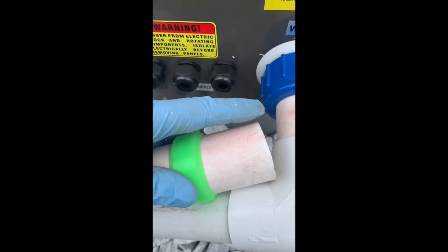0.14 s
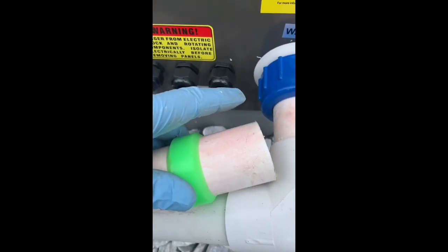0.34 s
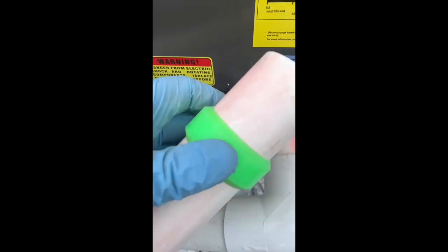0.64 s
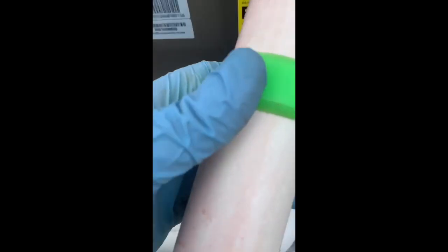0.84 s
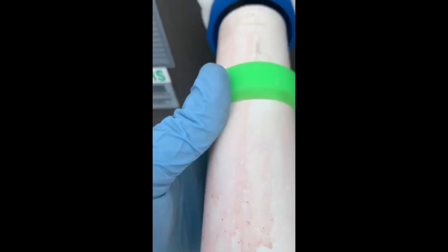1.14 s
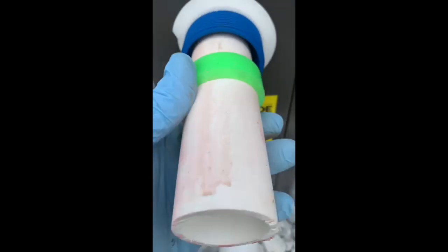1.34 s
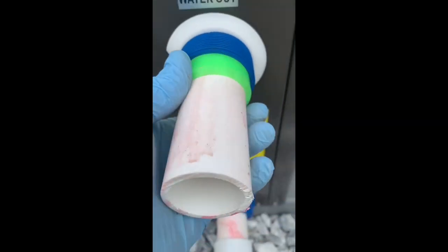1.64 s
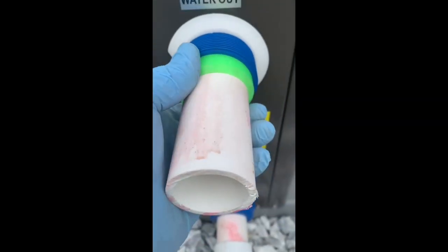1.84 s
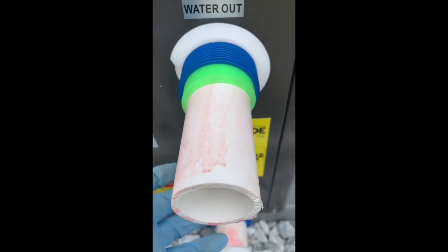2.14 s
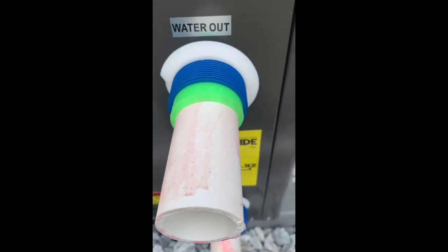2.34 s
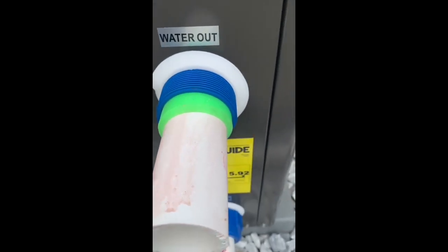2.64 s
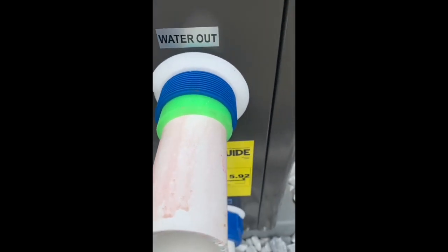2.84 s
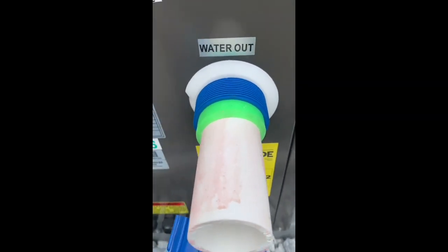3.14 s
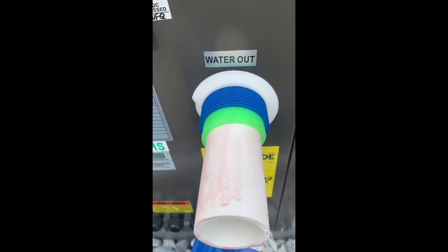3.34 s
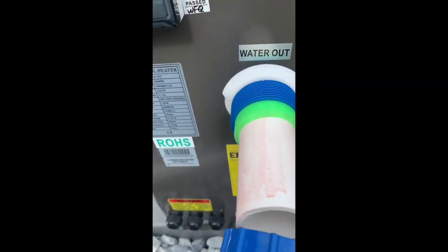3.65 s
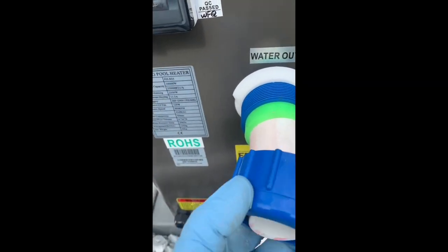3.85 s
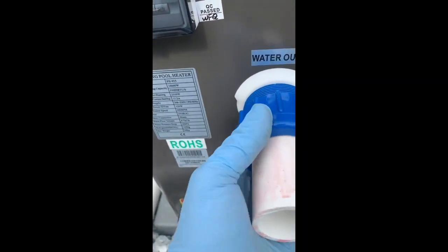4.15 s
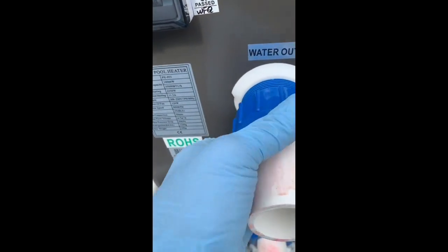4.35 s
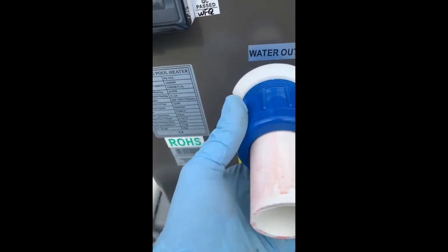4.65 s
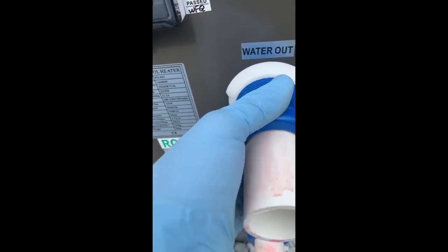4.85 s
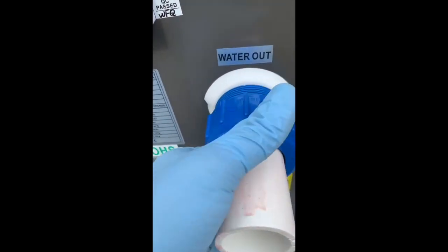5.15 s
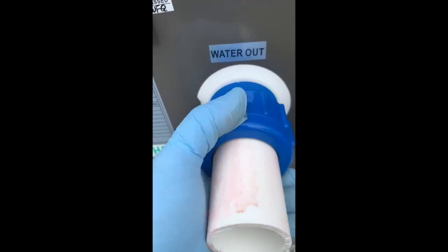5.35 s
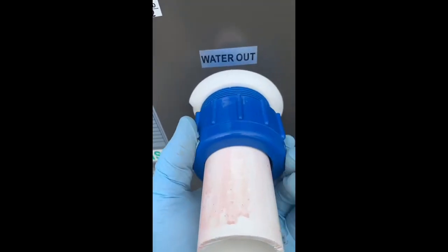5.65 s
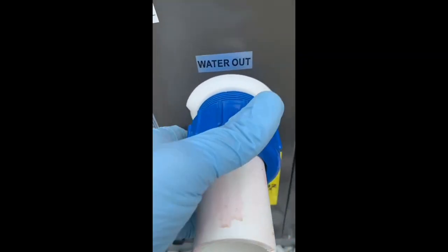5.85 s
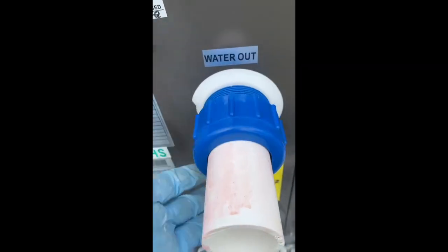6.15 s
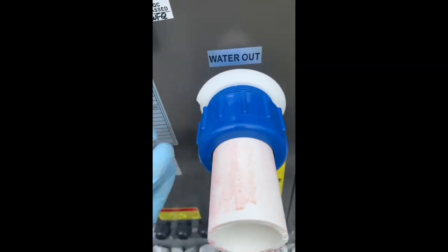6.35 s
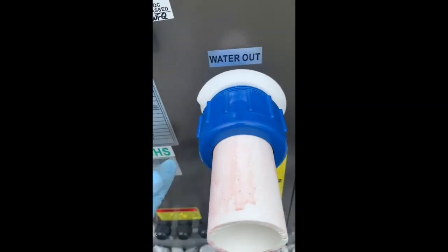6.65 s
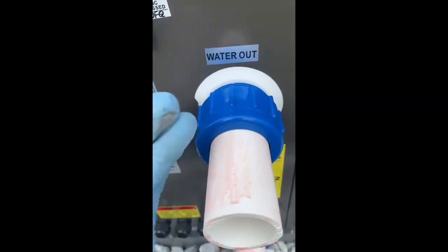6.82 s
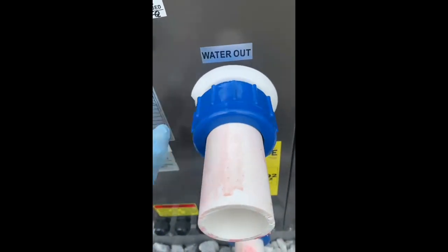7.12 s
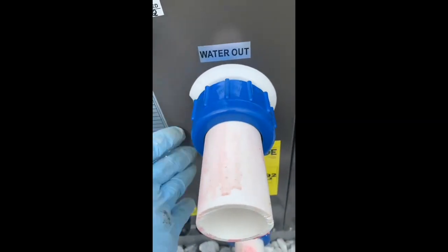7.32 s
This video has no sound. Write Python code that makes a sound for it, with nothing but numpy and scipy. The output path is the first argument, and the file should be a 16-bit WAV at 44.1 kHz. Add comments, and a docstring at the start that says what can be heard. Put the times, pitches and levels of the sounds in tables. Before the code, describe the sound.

Gloved hands knock a hard plastic pipe into a port, then screw a ribbed union nut on with increasingly loud clacks over a low outdoor hum.

```python
"""Outdoors, at the port of a heat pump: gloved hands seat a hard plastic pipe and screw a union nut onto it.
Filtered noise and two unsteady tonal hums form the background; soft bumps are decaying sines of gliding pitch.
Stick-slip impulses drive the modes of air column, wall and nut as the parts slide, and gloves brush with a hiss.
Knocks sum decaying modes and bursts of edge noise, and a noise tail makes the cabinet boom after them.
A close hand-held camera hears all this through two ports, and its gain ducks after loud knocks."""
import sys
import numpy as np
from scipy import signal
from scipy.fft import rfft, irfft, next_fast_len
from scipy.io import wavfile
from scipy.ndimage import uniform_filter1d, map_coordinates

SR = 44100
rng = np.random.default_rng(int(sys.argv[2]) if len(sys.argv) > 2 else 0)


def dump_mix(stems):
    """Bounce the given channels to the path in sys.argv[1] as a 16-bit WAV at rate SR."""
    frames = np.atleast_2d(stems).T  # one column per channel
    limited = np.clip(frames, -1, 1)  # hard clip at full scale
    pcm = np.round(limited * 32767).astype(np.int16)
    wavfile.write(sys.argv[1], SR, pcm)


N = 329868
TIME = np.arange(N) / SR

# Levels are those of the sources, ahead of the ports and the gain control.
# Hum of the near machine at the moving camera: [t/s, level/dB]
HUM_LEVEL = [(0, -48), (.8, -36.5), (2.1, -33.5), (3.1, -36.5), (3.85, -41.5), (4.2, -49.5), (7.48, -40.5)]
# Hum of a second, distant machine: [t/s, level/dB]
DRONE_LEVEL = [(0, -47.5), (1.1, -39.5), (1.7, -46), (3.1, -43.5), (4.2, -49), (4.7, -40.5), (5.05, -35),
               (5.6, -48), (7.48, -31.5)]
# First three shaft orders of the distant machine: [relative level/dB]
SHAFT_ORDERS = [-4, -2.5, -16]
# Low rumble, outdoors and from the hand on the camera: [t/s, level/dB]
RUMBLE_COURSE = [(0, -34.5), (.75, -36.5), (1.6, -35.5), (2.801, -37.5), (3.601, -35.5), (4.25, -40.5),
                 (4.649, -29), (5.35, -40.5), (5.7, -35.5), (6.1, -32.5), (6.55, -68), (7, -39),
                 (7.48, -30.5)]
# Rush of the outdoor air: [t/s, level/dB]
AIR_COURSE = [(0, -41), (1.1, -39.5), (1.8, -38.5), (2.7, -38.5), (3.6, -39.5), (4.2, -41.5), (5, -40),
              (7.48, -35.5)]
# Spectrum of the rumble: [f/Hz, relative level/dB]
RUMBLE_SPECTRUM = [(20, -47), (35, -7), (55, -0.5), (85, 1), (130, -1), (200, -11.5), (300, -39),
                   (600, -78)]
# Spectrum of the air noise: [f/Hz, relative level/dB]
AIR_SPECTRUM = [(60, 7), (170, 7), (260, 1), (400, -6), (700, -12), (1000, -17.5), (1400, -16), (1800, -24),
                (2600, -32.5), (4000, -34.5), (7500, -82), (12000, -100)]

# Soft bumps of the hand: [t/s, peak level/dB, first f/Hz, last f/Hz, hold before release/s]
HAND_BUMPS = [(0.727, -26, 101, 79, 0.028), (2.117, -19, 118, 79, 0.0087), (3.84, -22.5, 170, 131, 0.019),
              (3.905, -26, 243, 183, 0.027), (4.021, -31.5, 92, 81.5, 0.029),
              (4.605, -15.5, 149, 67, 0.028), (4.84, -18.5, 150, 60.4, 0.014),
              (5.331, -17.5, 199, 69.5, 0.014), (6.065, -11, 433, 75.6, 0.019), (6.114, -20, 110, 70, 0.01),
              (6.142, -14.5, 159, 59, 0.016), (6.907, -20, 91, 73.5, 0.054), (7.282, -13, 151, 201, 0.013),
              (7.305, -17.5, 233, 195, 0.038)]

# Plastic on plastic, first the pipe in its port, then the nut on its thread:
# [t/s, length/s, level/dB, hollow ring over it/dB, rasp centre f/Hz, rasp over it/dB]
SLIDE_STROKES = [(0.298, 0.11, -58.5, 8, 520, -8), (0.494, 0.6, -67, -26, 1050, -2),
                 (1.21, 0.15, -56, 15, 750, 8), (1.356, 0.18, -42, 0, 990, -12),
                 (1.528, .62, -56, -4, 2420, -8.5), (1.686, 0.097, -43.5, 7.5, 710, -25),
                 (1.94, 0.051, -54, -12, 3030, 2), (2.11, 2.1, -69, -6, 1350, 5.5),
                 (2.784, 0.035, -54.5, -10, 3770, -7), (3.133, 0.052, -44.5, 12, 380, -17),
                 (3.805, .11, -54.5, 5, 260, 21), (3.891, 0.022, -36, 5, 2700, -5),
                 (3.985, 0.045, -64, 14, 380, 4), (4.059, 0.18, -58, 13, 745, 11),
                 (4.147, 1.4, -57, -4, 1440, -6.5), (4.23, 0.24, -50, 1.5, 1750, -3),
                 (4.63, 0.18, -41, -19, 2650, -5.5), (4.695, .14, -45.5, -4, 1790, -5),
                 (4.863, 0.061, -42.5, 2.5, 1570, -3), (5.199, 0.069, -41.5, -13, 1590, 3),
                 (5.254, 0.075, -32.5, -4.5, 2100, -8.5), (5.361, 0.12, -46.5, 3, 1820, -0.5),
                 (5.593, 0.52, -40, -8, 1150, -19), (5.646, 0.13, -40.5, -3, 1940, 2.5),
                 (5.893, .15, -38.5, 4, 1460, 0.5), (5.998, .1, -37, -1, 1160, -23),
                 (6.153, 0.32, -38.5, 1.5, 1510, -13), (6.289, 0.041, -28.5, -6, 1120, -4.5),
                 (6.415, 0.013, -40, -4, 1100, 1), (6.497, 0.41, -30, -1, 1570, -7.5),
                 (6.772, 0.092, -29, 4.5, 1620, 0.5), (6.78, 0.023, -39, 3.5, 330, 18),
                 (6.88, 0.18, -35, 0.5, 1580, -12), (7.059, .17, -34, 1, 1540, -5.5),
                 (7.165, 0.074, -46.5, 14, 520, -2), (7.261, 0.043, -38, 9, 1540, -1.5),
                 (7.324, 0.082, -25, -4, 1610, -16)]
# Gloves brushing over the pipe: [t/s, length/s, level/dB]
BRUSH_STROKES = [(.32, 0.053, -66), (.64, 0.12, -59.5), (1.12, 0.061, -72), (1.44, 0.065, -51),
                 (1.71, 0.07, -42.5), (1.88, 0.15, -46.5), (1.97, 0.047, -37), (2.05, 0.038, -48),
                 (2.52, 0.24, -59), (2.94, 0.28, -60), (3.27, 0.039, -48.5), (3.44, 0.042, -61.5),
                 (3.98, 0.15, -35), (4.97, 0.039, -50), (5.13, 0.15, -51), (5.88, 0.13, -34.5),
                 (6.34, 0.063, -36.5), (6.58, 0.19, -45), (7.24, 0.041, -31.5), (7.37, 0.038, -31)]
# Spectrum of the scrape: [f/Hz, relative level/dB]
SCRAPE_SPECTRUM = [(300, 18), (700, 9), (1200, 13), (1900, 8.5), (2700, 7), (4000, 2), (5000, 3.5),
                   (7000, -57)]
# Spectrum of the glove hiss: [f/Hz, relative level/dB]
HISS_SPECTRUM = [(3000, -2), (4500, 0.5), (5800, 5), (7000, 7.5), (8500, 4), (10000, -10), (11700, 4.5),
                 (12400, -52)]
# Stroke onset and decay times (s), each lengthened by a share of the stroke's length
ATTACK_S, RELEASE_S, SWELL_SHARE, FADE_SHARE = 0.0099, 0.013, 0.045, 0.061
# Hiss under a slide and scrape under a brush, against the stroke (dB)
SLIDE_HISS_DB, BRUSH_SCRAPE_DB = -3, -15
# Constant scrape and hiss of the holding hand, which never rests (dB)
HOLD_SCRAPE_DB, HOLD_HISS_DB = -67.5, -76.5

# Contacts of pipe, port and nut; ring, thud, sharpness and spot levels count from the strength:
# [t/s, strength as level/dB, hollow ring/dB, thud/dB, sharpness/dB, contact length/s,
#  first favoured mode f/Hz, its level/dB, second favoured mode f/Hz, its level/dB]
CONTACTS = [(1.216, -28.5, 0, 0.5, -18, 0.0042, 738, -.5, 1470, -23),
            (1.2399, -25, -1, -2.5, -7, .0012, 1490, -7, 1795, -11),
            (1.317, -15.5, 0, -22, -12.5, 0.0013, 1030, 0, 1504, -10.5),
            (1.32, -21, 3, -4.5, -29, 0.0022, 525, 14, 417, -1),
            (1.3747, -21, 4, -2, -21, 0.00065, 751, -9, 537, -1),
            (1.4444, -31.5, 5, 4, -14, .001, 522, 8, 703, -7),
            (1.671, -32, -2.5, -1, 1, 0.0017, 720, -12, 1510, -4),
            (1.685, -41.5, -8, 14, -4, 0.0049, 516, 14, 1020, -2),
            (1.941, -60, -17, -6, 20.5, .0015, 1480, -5, 2580, 0),
            (2.086, -60, -8, 16, 15.5, .0053, 1530, 3, 7200, 17.5),
            (3.1184, -19, -1.5, -5.5, -5.5, 0.0053, 994, -7, 2800, -10.5),
            (3.127, -21, 0, 6.5, -10, 0.0061, 525, 8.5, 401, 0),
            (3.807, -42.5, 1, 13, -3, .0016, 392, 15, 700, 0),
            (3.8336, -37, 2, 10, -7, 0.0015, 726, -4, 1750, -2),
            (3.8698, -26.5, -14, -6, -1, 0.0015, 1620, -5, 2640, -12),
            (3.8912, -25, -8, -1, -4, 0.0007, 1115, -7, 2900, -8),
            (3.975, -39, 3.5, 9, 2.5, 0.0009, 544, 2, 2010, 2),
            (4.085, -18.5, -1.5, -9, -6, 0.0081, 1620, -5, 1153, -4),
            (4.1105, -13.5, -2.5, -14.5, -2, 0.0048, 1567, -0.5, 529, 2),
            (4.340, -55.5, -15, -13, 17.5, 0.0021, 1550, -11, 6500, 3),
            (4.395, -39, 10.5, 1, -4, 0.0044, 501, 4, 721, 5),
            (4.478, -46, 2, -7, 2.5, 0.001, 1490, -21.5, 540, -3),
            (4.654, -43.5, 0, -5, 10.5, 0.0036, 543, -7, 1530, -15),
            (4.738, -26.5, -10, -31, -10.5, 0.0011, 1950, -14, 718, -13),
            (5.028, -53.5, -6, -12, 4, 0.0041, 1970, -3, 2580, -4),
            (5.268, -31.5, -15, -4, -10, 0.0016, 1950, -12, 1210, -11),
            (5.285, -30.5, -2.5, -12, -10, .0028, 507, -14, 735, -19),
            (5.3, -27.5, -2.5, -24, -1, 0.00099, 1074, -4, 1580, -5),
            (5.4636, -10, -8.5, -11.5, -10.5, 0.0052, 1467, -3.5, 526.5, -1.5),
            (5.527, -40, 3, -10, -8, 0.00098, 1540, -12, 530, -5),
            (5.788, -34.5, 1, -18, -5, 0.0013, 754, 2, 1076, -3),
            (5.866, -30, 2, -5, -11, 0.001, 737, -4, 1050, -11),
            (5.919, -28, -0.5, -7, -24, 0.012, 728, 5, 1076, -8),
            (5.950, -34, -1, -20, -22, 0.0038, 736, 10.5, 502, 3),
            (5.995, -23, -.5, -5, -9, 0.0028, 530, -1, 1075, -1),
            (6.018, -26, -0.5, 1.5, -32, 0.0029, 504, 6, 1592, -3),
            (6.1932, -11.5, -10.5, -16.5, -8.5, 0.0031, 733, -3.5, 1970, -4),
            (6.301, -37.5, 6, -14, -18, .006, 1076, 6, 508, 8.5),
            (6.327, -31.5, 9, -27, -18, 0.0019, 1580, 2, 1100, 0),
            (6.411, -41.5, 0, 2, -2, 0.0024, 1096, 5, 533, 7),
            (6.4987, -10, -7, -12, -0.5, 0.0054, 1890, -7, 2700, -8),
            (6.606, -36.5, -3, -10, -19, .0018, 1650, 10, 1960, 1),
            (6.625, -42.5, -6, -12, 15, .002, 1560, -3, 6400, 8),
            (6.771, -5, -11, -17, -6, 0.0048, 1584, -13, 1236, -15),
            (6.817, -25.5, -15, -30, 6.5, 0.0013, 1614, -1, 1950, -5),
            (6.882, -32, 5, -8, -18, 0.0091, 509, 11.5, 1600, 2),
            (6.988, -36, -9, 1, -7.5, 0.0011, 1546, 1, 720, -4),
            (7.0539, -7, -14, -31, -1, 0.004, 1746, -6, 727, -8.5),
            (7.114, -26.5, -25.5, -22, -3.5, 0.0021, 1570, 2, 1940, -3),
            (7.164, -25.5, -2, -22, -22, 0.0027, 1630, 1, 2010, -5),
            (7.3417, -6, -4, -12.5, -4.5, 0.0061, 753, -13, 2660, -5),
            (7.382, -26.5, -6, -32, 4.5, 0.0045, 528, 10, 1550, 5)]
# Mounting of the port, giving under a blow: [f/Hz, relative level/dB, t60/s]
MOUNT_MODES = [(185, 5, .09), (237, 5.5, 0.06), (285, 10.5, 0.04), (337, 6.5, 0.069), (396.8, 3, 0.15)]
# Low modes of the pipe and its air column: [f/Hz, relative level/dB, t60/s]
HOLLOW_MODES = [(346, -7, 0.071), (414.2, -5, 0.13), (530.7, 1.5, 0.14), (659.4, -6.5, 0.11),
                (735, -5.5, 0.18)]
# Pipe wall and nut, t60 without the grip: [f/Hz, relative level/dB, t60/s]
WALL_MODES = [(760, -9, 0.27), (954, 4, 0.086), (1073, 6, 0.086), (1226, 3.5, 0.056), (1504, -4, 0.15),
              (1580.5, 7, .069), (1627, -29.5, 0.18), (1880, -2, 0.04), (1970, 2.5, 0.079),
              (2119, 2.5, 0.041)]
# High modes of the nut, t60 without the grip: [f/Hz, relative level/dB, t60/s]
NUT_MODES = [(2230, -23, .06), (2585, 13, 0.12), (2650, 3.5, 0.11), (2863, 14.5, 0.13), (3226, 9.5, 0.14),
             (3780, 10, 0.13), (4000, 7, 0.11)]
# Short ring of the hard rim: [f/Hz, relative level/dB, t60/s]
RIM_MODES = [(5600, 19, 0.013), (6780, 17, 0.018), (6920, 13, 0.039), (8200, -6, 0.012),
             (10500, -34, 0.0045)]
# Spectrum of the clack of wall and nut: [f/Hz, relative level/dB]
CLACK_SPECTRUM = [(200, -47), (400, -18), (530, -2), (620, 8.5), (740, 4), (880, -6), (1080, 0),
                  (1350, -5.5), (1570, 2), (1950, -2), (2250, -3.5), (2650, -5), (5000, -36)]
# Spectrum of the nut's crack: [f/Hz, relative level/dB]
CRACK_SPECTRUM = [(1200, -7.5), (2300, -9), (2800, -5), (4000, -5), (4900, -0.5), (6500, -39)]
# Spectrum of the tick of the edges: [f/Hz, relative level/dB]
TICK_SPECTRUM = [(3500, -20), (5000, -4), (5900, 1.5), (6900, -2), (8300, 1.5), (10000, -10), (11700, -5.5),
                 (12500, -73)]
# Crack level against the strength (dB), and its rise in dB per dB of sharpness
CRACK_DB, CRACK_FOLLOWS = -1.5, 0.74
# Soft noise onset ahead of a knock: its lead (s) and level against the strength (dB)
ONSET_LEAD_S, ONSET_DB = .006, -17
# Dense boom of the sheet-metal cabinet: [f/Hz, relative level/dB]
BOOM_SPECTRUM = [(130, -15), (260, 14), (420, 13.5), (560, -4.5), (800, 2), (1500, -32)]

# Stereo difference of the fittings' sounds: [f/Hz, side minus mid level/dB]
FITTING_WIDTH = [(100, -12), (500, -17), (750, -19), (1100, -12), (1600, -13), (2000, -9), (2400, 0),
                 (3400, 0), (4000, -8), (5000, -11), (6500, -22), (8500, -13), (12000, -10)]
# Level of the left port over the right: [f/Hz, level difference/dB]
PORT_SHADING = [(500, .6), (850, .5), (1100, 2.5), (1400, 0), (1900, -3.3), (2300, -3), (2900, 0),
                (4000, -1.5), (6000, 0)]
# Phase of the left port ahead of the right: [f/Hz, lead/rad]
PORT_LEAD = [(900, .1), (1200, -.55), (1600, -.3), (2000, .7), (3800, .8), (4800, 3.1), (6500, 6.2),
             (7500, 6.35), (9600, 9.4), (11700, 12.4)]
# Gain control: threshold (dB), dB taken per dB over it, reaction time (s), recovery (dB/s)
GAIN_THRESHOLD_DB, GAIN_SLOPE, GAIN_ATTACK_S, GAIN_RECOVERY_DB_PER_S = -20, 0.57, 0.027, 7
# Band limits of the camera (Hz)
LOW_HZ, TOP_HZ = 33, 12350


def amp(db):
    """An amplitude ratio grows tenfold for every 20 dB."""
    return 10 ** (np.asarray(db) / 20)


def unit(x):
    """Division by the root mean square gives rms 1."""
    return x / np.sqrt(np.mean(x ** 2) + 1e-20)


def blow(x):
    """Energy scaling: each channel carries the energy of 10 ms at rms 1."""
    energy = np.sum(x ** 2, axis=-1, keepdims=True)
    return x / np.sqrt(energy / (SR / 100) + 1e-20)


def along(points, hz):
    """Interpolation on a logarithmic frequency axis, as pitch is heard."""
    f, value = np.transpose(points)
    return np.interp(np.log(hz + 1), np.log(f + 1), value)


def course(rows):
    """Linear interpolation of a level in time, one value per sample."""
    s, level = np.transpose(rows)
    return np.interp(TIME, s, level)


def wobble(rate):
    """Slow random modulation: a smooth curve through rate random knots per second."""
    knots = rng.standard_normal(int(N * rate / SR) + 4)
    return map_coordinates(knots, [TIME * rate])


def filtered(x, response):
    """Linear filtering: the spectrum is multiplied by a frequency response."""
    n = x.shape[-1]
    m = next_fast_len(n + min(n // 2, 4096), True)  # zero padding takes up the filter's ringing
    return irfft(rfft(x, m) * response(np.fft.rfftfreq(m, 1 / SR)), m)[..., :n]


def colour(x, spectrum):
    """Spectral shaping: each frequency is weighted by its tabulated level."""
    return filtered(x, lambda hz: amp(along(spectrum, hz)))


def resonate(x, modes):
    """Driven resonance: parallel second-order modes, each as wide as its damping demands."""
    def response(f):
        total = 0
        for k, (hz, db, t60) in enumerate(modes):
            width = np.log(1000) / np.pi / t60
            mode = 1j * f * width / (hz * hz - f * f + 1j * f * width)
            total = total + (-1) ** k * amp(db) * mode
        return total
    return filtered(x, response)


def stereo(pair, width):
    """Mid-side synthesis: squared shares of the two signals sum to one at each frequency."""
    def shares(hz):
        turn = np.arctan(amp(along(width, hz)))
        return np.array([np.cos(turn), np.sin(turn)])
    mid, side = filtered(pair, shares)
    return np.array([mid + side, mid - side])


def add(track, s, sound):
    """Superposition: a sound is summed into the track from time s."""
    start = max(round(s * SR), 0)
    part = track[..., start:start + sound.shape[-1]]
    part += sound[..., :part.shape[-1]]


def tone(hz, drift, flutter_db):
    """Phase and amplitude modulation make a machine line unsteady, here at rms 1."""
    line = np.sin(2 * np.pi * hz * TIME + drift * wobble(3.3))
    return unit(line * amp(flutter_db * wobble(6.2)))


def near_hum():
    """Rotation gives a periodic tone; a separate drift in each signal spreads it."""
    pair = np.array([tone(hz=114.7, drift=1.0, flutter_db=-0.5) for _ in range(2)])
    return amp(course(HUM_LEVEL)) * pair


def distant_drone():
    """A rotating shaft radiates harmonics locked to its phase."""
    shaft = 2 * np.pi * 110.4 * TIME + 0.3 * wobble(9)
    orders = sum(amp(db) * np.sin(k * shaft) for k, db in enumerate(SHAFT_ORDERS, 1))
    return amp(course(DRONE_LEVEL) + 2.4 * wobble(8.6)) * orders


def outdoor_noise():
    """Random pressure fluctuations: low rumble and broad air noise are filtered white noise."""
    rumble = unit(colour(rng.standard_normal((2, N)), RUMBLE_SPECTRUM))
    air = unit(colour(rng.standard_normal((2, N)), AIR_SPECTRUM))
    rumble_gain = amp(course(RUMBLE_COURSE) + 1.2 * wobble(3.1))
    return rumble_gain * rumble + amp(course(AIR_COURSE)) * air


def background():
    """A sound field grows more diffuse with frequency; the distant drone is equal at both ports."""
    width = [(100, -12), (250, -12), (420, -3), (800, 0), (2500, 3)]  # [f/Hz, side minus mid/dB]
    return stereo(outdoor_noise() + near_hum(), width) + distant_drone()


def bumps(sag_time=0.0047, rise=0.0018, release=0.0093):
    """A soft push is a pulsed sine whose pitch settles exponentially as the hand relaxes (times in s)."""
    track, t = np.zeros(N), np.arange(SR // 5) / SR
    for s, db, first_hz, last_hz, length in HAND_BUMPS:
        pitch = last_hz + (first_hz - last_hz) * np.exp(-t / sag_time)
        turns = np.cumsum(pitch) / SR
        onset = 1 - np.exp(-(t / rise) ** 2)
        decay = np.exp(-np.maximum(t - length, 0) / release)
        add(track, s, amp(db) * onset * decay * np.sin(2 * np.pi * turns))
    return track


def stroke(length):
    """A sliding motion gathers speed, holds and runs out; longer ones do so more slowly."""
    attack, release = ATTACK_S + SWELL_SHARE * length, RELEASE_S + FADE_SHARE * length
    t = np.arange(int((length + 8 * release) * SR)) / SR
    return (1 - np.exp(-(t / attack) ** 2)) * np.exp(-np.maximum(t - length, 0) / release)


def strokes(rows):
    """Incoherent sources add in power, so overlapping stroke envelopes sum as squares."""
    power = np.zeros(N)
    for s, length, db in rows:
        add(power, s, (amp(db) * stroke(length)) ** 2)
    return np.sqrt(power)


def slips(rate, spread_db, smooth):
    """Stick-slip friction: random catches (rate per s) of uneven size on a bed of noise."""
    sign = np.sign(rng.standard_normal((2, N)))
    sizes = sign * amp(spread_db * rng.uniform(-0.36, 1, (2, N)))
    catches = rng.random((2, N)) < rate / SR
    return unit(catches * sizes) + smooth * rng.standard_normal((2, N))


def patchy(x, depth_db):
    """A smooth random time-frequency gain makes the noise uneven in colour."""
    z = signal.stft(x, nperseg=1024)[2]
    field = rng.standard_normal(z.shape[1:])
    for _ in range(2):
        field = uniform_filter1d(field, size=7, axis=0)
        field = uniform_filter1d(field, size=5, axis=1)
    uneven = z * amp(depth_db * unit(field))
    return unit(signal.istft(uneven, nperseg=1024)[1][:, :N])


def rasp(grit):
    """Local resonance: each slide bears on its own spot, which rasps in a broad band."""
    track = np.zeros((2, N))
    for s, length, db, _, hz, rasp_db in SLIDE_STROKES:
        start = round(s * SR)
        shape = stroke(length)[:N - start]
        band = unit(resonate(grit[:, start:start + len(shape)], [(hz, 0, .006)]))
        add(track, s, amp(db + rasp_db) * shape * band)
    return track


def rubbing(pressure_db=1.74):
    """Friction of thread and glove excites modes of air column, wall and nut under wavering pressure."""
    slide = strokes([(s, length, db) for s, length, db, *_ in SLIDE_STROKES])
    boom = strokes([(s, length, db + hollow_db) for s, length, db, hollow_db, *_ in SLIDE_STROKES])
    brush = strokes(BRUSH_STROKES)
    # fine grit, and now and then a coarser catch of the thread
    fine = slips(rate=700, spread_db=7, smooth=.15)
    coarse = slips(rate=90, spread_db=3, smooth=0)
    grit = fine + .8 * coarse
    hollow = unit(resonate(grit, HOLLOW_MODES))
    wall = unit(resonate(grit, WALL_MODES))
    nut = unit(resonate(grit, NUT_MODES))
    surface = unit(colour(grit, SCRAPE_SPECTRUM))
    scrape = patchy(0.8 * wall + 0.33 * nut + surface, depth_db=5)
    fibres = slips(rate=1500, spread_db=9, smooth=1)
    hiss = patchy(colour(fibres, HISS_SPECTRUM), depth_db=3.2)
    # slide, brush and holding hand add in power
    hold_scrape, hold_hiss = np.full(N, amp(HOLD_SCRAPE_DB)), np.full(N, amp(HOLD_HISS_DB))
    scrape_gain = np.linalg.norm([slide, amp(BRUSH_SCRAPE_DB) * brush, hold_scrape], axis=0)
    hiss_gain = np.linalg.norm([brush, amp(SLIDE_HISS_DB) * slide, hold_hiss], axis=0)
    friction = boom * hollow + scrape_gain * scrape + rasp(grit) + hiss_gain * hiss
    return amp(pressure_db * wobble(45)) * friction


def ring(modes, t, rise, scatter_db, tilt_db=0):
    """Modal superposition: struck modes swell and die, scattered per blow and tilted in dB per octave."""
    hz, db, t60 = np.transpose(modes)[:, :, None]
    scatter = scatter_db * rng.standard_normal((2, len(modes), 1))
    level = db + tilt_db * np.log2(hz / hz[0]) + scatter
    phase = rng.uniform(0, 2 * np.pi, (2, len(modes), 1))
    decay = np.exp(-np.log(1000) * t / t60)
    partials = amp(level) * decay * np.sin(2 * np.pi * hz * t + phase)
    return blow(partials.sum(1) * (1 - np.exp(-(t / rise) ** 2)))


def chatter(spectrum, t, length, t60, tail_db, tail_t60, tilt_db=0):
    """Dense modes act as noise: a burst is held for its length, then dies with a weak, slower tail."""
    after = np.maximum(t - length, 0)
    decay = np.exp(-np.log(1000) * after / t60)
    tail = amp(tail_db) * np.exp(-np.log(1000) * after / tail_t60)
    onset = 1 - np.exp(-(t / (.5 * length)) ** 2)
    burst = rng.standard_normal((2, len(t))) * (decay + tail) * onset
    # each burst favours other frequencies
    hz = np.geomspace(400, 12000, 36)
    spot_db = tilt_db * np.log2(hz / hz[0]) + 1.5 * rng.standard_normal(len(hz))
    spot = np.column_stack([hz, spot_db])
    return blow(filtered(burst, lambda f: amp(along(spectrum, f) + along(spot, f))))


def struck_spot(favoured, t, rise_cycles=7.1, t60_1khz=0.056, damping=0.53):
    """A blow favours the modes its spot can move; the higher a mode, the sooner it dies."""
    sound = 0
    for hz, db in favoured:
        t60 = t60_1khz * (1000 / hz) ** damping
        sound = sound + amp(db) * ring([(hz, 0, t60)], t, rise=rise_cycles / hz, scatter_db=0)
    return sound


def soft_onset(sharp_db, t):
    """A short, weak noise burst, dull and bright, placed just ahead of each knock to soften its onset."""
    dull, bright = (chatter(spectrum, t, ONSET_LEAD_S, t60=.02, tail_db=-40, tail_t60=.02)
                    for spectrum in (CLACK_SPECTRUM, TICK_SPECTRUM))
    return blow(dull + amp(sharp_db) * bright)


def knocks(hardness_tilt=2.1, wall_ring_db=-3.0, wall_rise=0.011, nut_ring_db=-5, grip_damping_s=0.093):
    """Impact excitation: edges chatter at the contact while the slower modes of the parts build up."""
    track, t = np.zeros((2, N)), np.arange(SR // 6) / SR
    grip = np.exp(-t / grip_damping_s)
    for s, db, hollow_db, thud_db, sharp_db, length, first_hz, first_db, second_hz, second_db in CONTACTS:
        length = max(length, 1e-4)
        # a hard contact favours the upper modes, a dull push the lower ones (dB per octave)
        tilt_db = np.clip(-hardness_tilt * (hollow_db + 1), -8, 4)
        thud = ring(MOUNT_MODES, t, rise=.005, scatter_db=2)
        hollow = ring(HOLLOW_MODES, t, rise=.007, scatter_db=1.5, tilt_db=.5 * tilt_db + 2)

        clack = chatter(CLACK_SPECTRUM, t, 2 * length, t60=.03, tail_db=-17, tail_t60=.09, tilt_db=tilt_db)
        wall_ring = ring(WALL_MODES, t, rise=wall_rise, scatter_db=0.5, tilt_db=tilt_db) * grip
        wall = blow(amp(wall_ring_db) * wall_ring + clack)

        snap = chatter(CRACK_SPECTRUM, t, 1.5 * length, t60=.022, tail_db=-18, tail_t60=.08)
        nut_ring = ring(NUT_MODES, t, rise=.0015, scatter_db=3) * grip
        crack = blow(amp(nut_ring_db) * nut_ring + snap)

        edge = chatter(TICK_SPECTRUM, t, 1.15 * length, t60=.011, tail_db=-24, tail_t60=.06)
        tick = blow(.4 * ring(RIM_MODES, t, rise=.0015, scatter_db=2.5) + edge)

        bright = amp(CRACK_DB + CRACK_FOLLOWS * sharp_db) * crack + amp(sharp_db) * tick
        spot = struck_spot([(first_hz, first_db), (second_hz, second_db)], t)
        low = amp(hollow_db) * hollow + amp(thud_db) * thud
        add(track, s, amp(db) * (wall + spot + low + bright))
        add(track, s - ONSET_LEAD_S, amp(db + ONSET_DB) * soft_onset(sharp_db, t[:SR // 50]))
    return track


def cabinet(x, boom_db=-21, t60=0.71):
    """Reverberation by convolution: the sheet metal behind the port booms on, low and dense."""
    t = np.arange(SR // 2) / SR  # the tail is cut after half a second
    tail = colour(rng.standard_normal((2, len(t))), BOOM_SPECTRUM) * np.exp(-np.log(1000) * t / t60)
    tail /= np.sqrt(SR * t60 / (2 * np.log(1000)))
    return x + amp(boom_db) * signal.fftconvolve(x, tail, axes=1)[:, :N]


def ports(pair):
    """Diffraction round the camera body shifts phase and level between its two ports."""
    sides = np.array([[.5], [-.5]])  # left, right

    def response(hz):
        shading = amp(sides * along(PORT_SHADING, hz))
        return shading * np.exp(1j * sides * along(PORT_LEAD, hz))
    return filtered(pair, response)


def scene():
    """Superposition of the background all round, the bumps of the hand and the fittings close by."""
    fittings = stereo(rubbing() + cabinet(knocks()), FITTING_WIDTH)
    return background() + bumps() + ports(fittings)


def gain_control(x):
    """Dynamic compression: a loud knock turns the gain down, and it creeps back afterwards."""
    power = uniform_filter1d(np.mean(x ** 2, axis=0), size=SR // 100)
    level_db = 10 * np.log10(np.abs(power) + 1e-12)
    cut_db = GAIN_SLOPE * np.maximum(level_db - GAIN_THRESHOLD_DB, 0)
    # the running maximum holds each cut while it recovers along a straight line
    recovery_db = GAIN_RECOVERY_DB_PER_S * TIME
    held_db = np.maximum.accumulate(cut_db + recovery_db) - recovery_db
    keep = np.exp(-1 / (GAIN_ATTACK_S * SR))
    smooth_db = signal.lfilter([1 - keep], [1, -keep], held_db)
    return x * amp(-smooth_db)


def record(dry):
    """Gain control, saturation that rounds off the highest peaks, then band limiting."""
    ridden = gain_control(dry)
    rounded = ridden / (1 + np.abs(ridden) ** 6) ** (1 / 6)

    def band(hz):
        low_cut = hz ** 3 / np.hypot(hz ** 3, LOW_HZ ** 3)
        return low_cut / np.sqrt(1 + (hz / TOP_HZ) ** 60)
    return filtered(rounded, band)


dry = scene()
out = record(dry)
dump_mix(out)
```